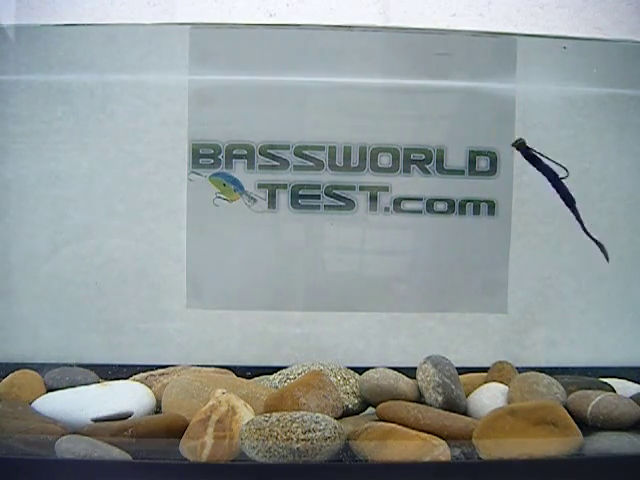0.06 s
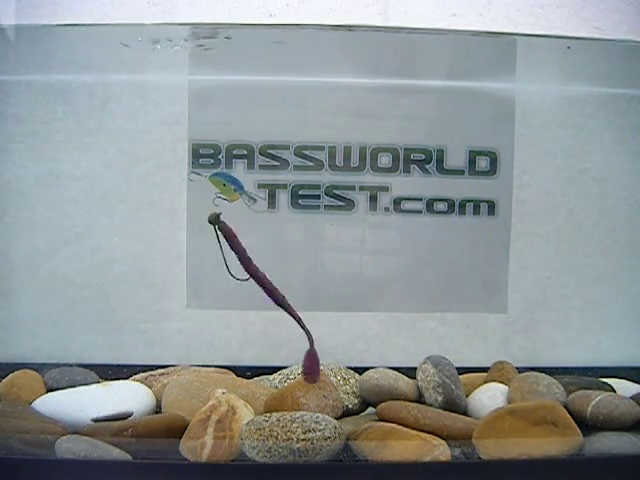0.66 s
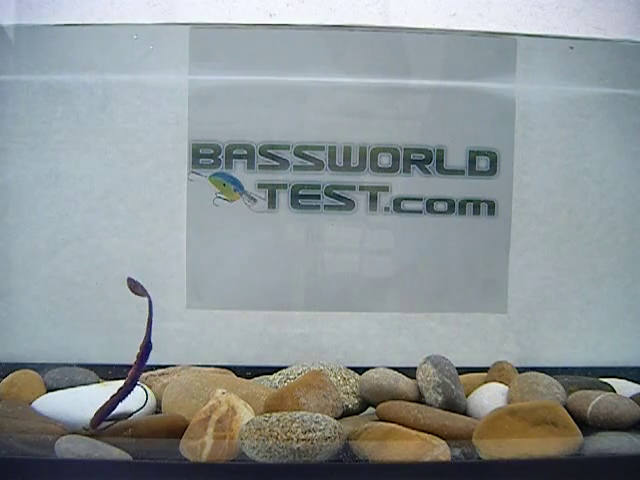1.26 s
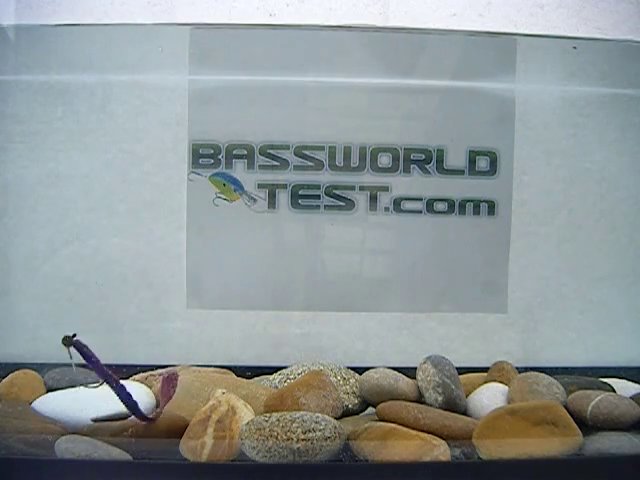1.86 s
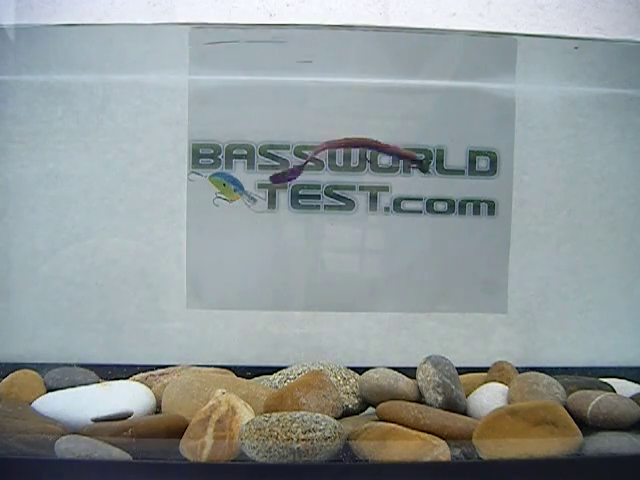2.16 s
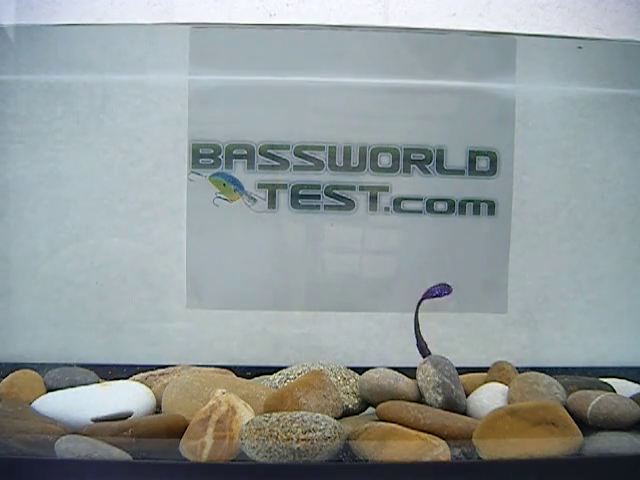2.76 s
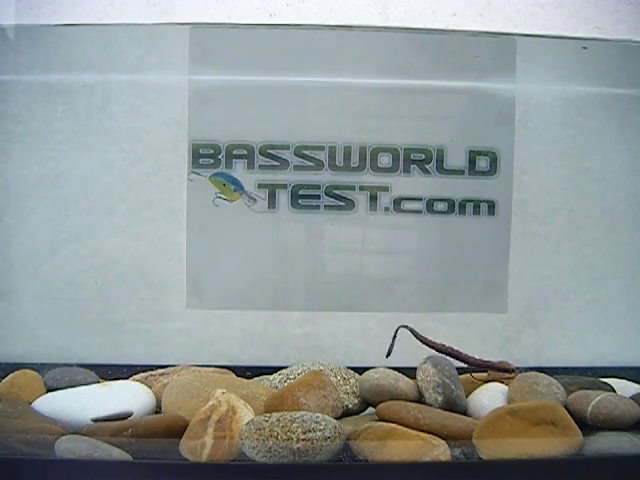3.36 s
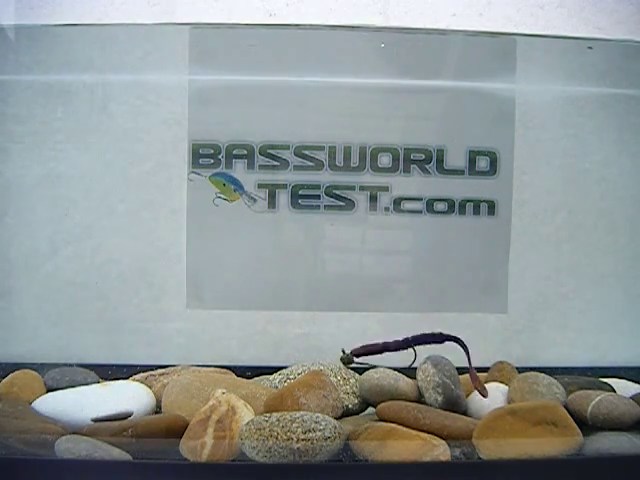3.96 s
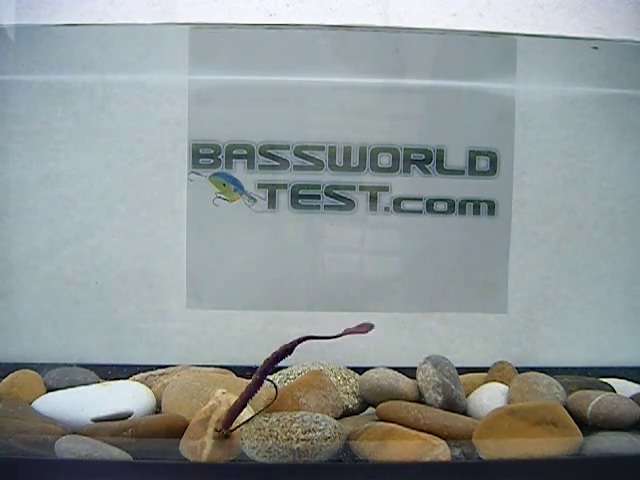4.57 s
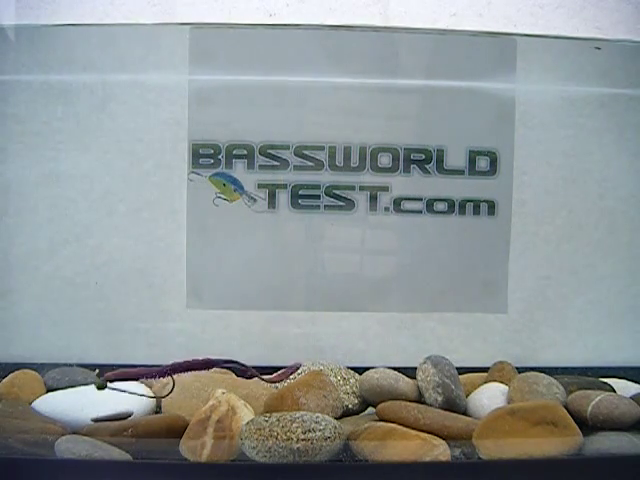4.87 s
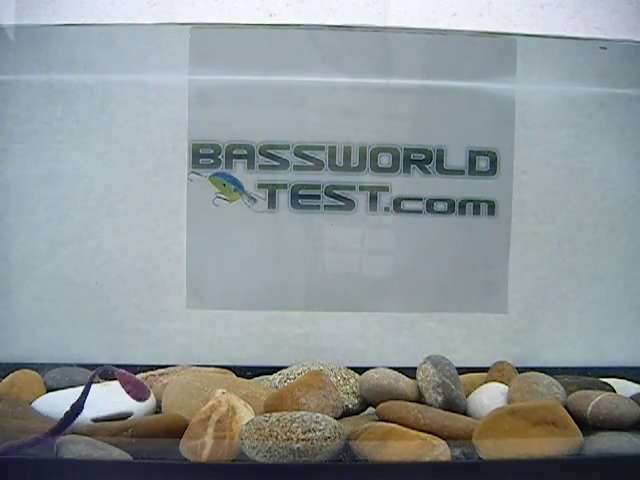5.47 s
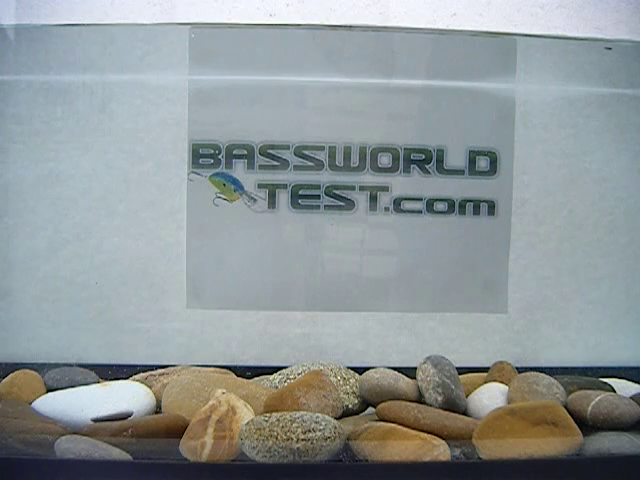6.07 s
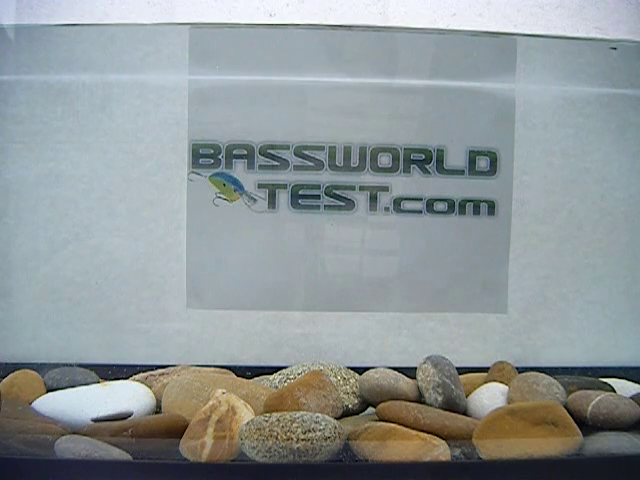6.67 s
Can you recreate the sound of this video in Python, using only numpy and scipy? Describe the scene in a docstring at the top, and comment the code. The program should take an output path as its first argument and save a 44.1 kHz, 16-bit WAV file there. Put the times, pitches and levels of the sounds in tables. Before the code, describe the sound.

Sharp, briefly ringing knocks and small ticks of a metal jig hopping over stones in an aquarium, above a steady low rumble.

```python
"""A water-filled glass tank: a weighted jig with a soft bait is hopped over the pebbles.
Its metal head cracks on the stones; each blow rings panes and water, and some pebbles rock and boom.
In between, hook and bait tick and scrape, and the taut line whistles faintly as it slides.
Underneath lie a low hum and the hiss of a pickup whose gain ducks after the hardest blows."""
import sys
import numpy as np
from scipy import signal
from scipy.fft import rfft, irfft
from scipy.io import wavfile
from scipy.ndimage import uniform_filter1d

SR = 44100
rng = np.random.default_rng(int(sys.argv[2]) if len(sys.argv) > 2 else 0)


def file_out(sig):
    """Save sig as 16-bit WAV at sys.argv[1]."""
    # one column per channel
    cols = np.atleast_2d(sig).T
    # limit, then scale
    lim = np.clip(cols, -1, 1)
    pcm = np.round(lim * 32767).astype(np.int16)
    wavfile.write(sys.argv[1], SR, pcm)


N = 296793
TIME_S = np.arange(N) / SR
AGE_S = TIME_S[:SR // 2]  # time within one event

# Head on stone: (time [s], relative level [dB], tilt [dB/oct], contact cut-off [Hz],
# crack over ring [dB], stone resonance [Hz], its boost [dB], stone note [Hz], note level [dB],
# rocking pitch [Hz], boom level [dB])
BLOWS = [(0.5259, -28, -0.6, 16000, 3, 3240, 6, 1132, -27.5, 570, -21.5),
         (1.089, -22.5, -0.37, 30000, -2.5, 2470, 9, 1248, -21, 735, -28),
         (1.208, -34.5, 0.5, 6500, -3, 2400, 2.5, 664, -45, 570, -38),
         (2.5070, -32, -1.3, 9500, -7.5, 2360, 3.5, 558, -25, 420, -25),
         (3.002, -39.5, 1.6, 5500, 3, 2900, 6, 1236, -31.5, 420, -42),
         (3.0130, -38, -0.9, 8000, -1, 1880, 7.5, 1120, -43, 281, -45),
         (3.0260, -43.5, -2, 9000, -9, 550, 1, 900, -46, 281, -43),
         (3.708, -53, -4, 6000, 2, 480, 4, 516, -37, 420, -47),
         (4.0818, -29.5, -1.6, 10000, 2.5, 3470, 6.5, 1147, -26.5, 218, -27.5),
         (4.5723, -33, -0.7, 12500, 3, 3500, 5.5, 1006, -31.5, 281, -40),
         (4.9914, -22.5, -0.35, 8650, 1.5, 690, 6, 1200, -29, 655, -29.5),
         (5.452, -18, 3.5, 10800, 1.5, 4100, 5, 1887, -22.5, 570, -34.5),
         (5.9320, -17.5, 3.5, 6830, 1.5, 3940, 9, 4130, -18, 735, -30)]
# Dense ring of panes and water: (frequency [Hz], gain [dB], early t60 [s], rise [s])
TANK_RING = [(111, -3.5, 0.84, 0.01), (267, 6, 0.43, 0.0033), (322, -6.5, 0.4, 0.025),
             (636, 2.5, 0.17, 0.0018), (1350, 3.5, 0.24, 0.0039), (1560, -1.5, 0.4, 0.0012),
             (1940, 1.5, 0.13, 0.00089), (3170, 0.5, 0.12, .001), (4530, -2.5, 0.17, 0.0003),
             (4700, 2.5, 0.033, 0.00028), (6460, 1.5, 0.15, 0.00036), (8150, 6, 0.099, 0.00024),
             (17000, -11.5, 0.064, 0.00029)]


def undb(db):
    """Decibels to gain."""
    return 10 ** (np.asarray(db) / 20)


def unit(x):
    """Scale to unit energy."""
    return x / np.sqrt(np.sum(x ** 2))


def add(out, start_s, x):
    """Mix x into out from start_s."""
    i = max(int(start_s * SR), 0)
    out[i:i + len(x)] += x[:N - i]


def log_interp(hz, at_hz, values):
    """Interpolate over log frequency."""
    return np.interp(np.log(hz + 1e-9), np.log(at_hz), values)


def colour(x, at_hz, db):
    """Minimum-phase filter through the given points."""
    size = 2 * len(x)
    gain = undb(log_interp(np.fft.rfftfreq(size, 1 / SR), at_hz, db))
    cepstrum = irfft(np.log(gain))
    cepstrum[1:len(x)] *= 2
    cepstrum[len(x) + 1:] = 0
    return irfft(rfft(x, size) * np.exp(rfft(cepstrum)))[:len(x)]


def band(hz, width_oct, size=len(AGE_S)):
    """Unit-rms noise in a bell around hz."""
    away = np.log2((np.fft.rfftfreq(size, 1 / SR) + 1) / hz) / width_oct
    x = irfft(rfft(rng.standard_normal(size)) * np.exp(-away ** 2 / 2), size)
    return x / x.std()


def fade(t60_s):
    """Free decay, 60 dB in t60_s."""
    return np.exp(-np.log(1000) * AGE_S / t60_s)


def build(rise_s):
    """Rise from silence as vibration spreads."""
    return 1 - np.exp(-AGE_S / rise_s)


def dense_ring(late_db=-17, late_t60_s=0.59):
    """Close modes of panes and water: lows come late and stay; a weak tail follows."""
    at_hz, _, t60s_s, rises_s = np.transpose(TANK_RING)
    out = 0
    for hz in np.geomspace(100, 17000, 24):
        t60_s, rise_s = log_interp(hz, at_hz, t60s_s), log_interp(hz, at_hz, rises_s)
        tail = undb(late_db) * min(t60_s / np.median(t60s_s), 1) * fade(late_t60_s)
        out += np.sqrt(hz) * unit(band(hz, 1 / 6) * build(rise_s) * (fade(t60_s) + tail))
    return unit(out)


def background(noise_db=-43.5, fall_db=2.5, ringing_db=-4):
    """Slowly easing rumble and hiss, partly heard through the ringing tank, and a steady hum."""
    # Noise spectrum: (frequency [Hz], relative density [dB])
    noise_spectrum = [(15, -28), (28, -0.5), (35, -4), (48, 1.5), (66, 3.5), (85, -8), (200, -10),
                      (520, -14.5), (800, -17), (2000, -23.5), (5000, -28), (10000, -32.5), (17000, -34.5)]
    # Hum lines: (frequency [Hz], rms level [dB])
    hum_lines = [(60, -66), (66.5, -58), (119, -61.5), (498, -62.5), (2400, -77)]
    ringing = signal.fftconvolve(rng.standard_normal(N + len(AGE_S) - 1), dense_ring(), "valid")
    noise = rng.standard_normal(N) + undb(ringing_db) * ringing
    noise = unit(colour(noise, *np.transpose(noise_spectrum))) * np.sqrt(N)
    hum = sum(undb(db) * np.sqrt(2) * np.sin(2 * np.pi * (hz * TIME_S + rng.random()))
              for hz, db in hum_lines)
    return noise * undb(noise_db + fall_db * (.5 - TIME_S / TIME_S[-1])) + hum


def grip(depth_db=2.0, grain_samples=60):
    """Uneven grip of rough stone, as a gain."""
    roughness = uniform_filter1d(rng.standard_normal(len(AGE_S)), grain_samples)
    return undb(depth_db * roughness * np.sqrt(grain_samples))


def scrapes(grit_hz=2850, pane_hz=560, pane_db=-6, rise_share=0.027):
    """The jig drags over stone: broad grit, a low pane murmur and one stone resonance; the long high rub at
    1.12 s is the line sliding."""
    # Drags, the one at 1.12 s being the line rubbing as it slides: (time [s], t60 [s], grit level [dB],
    # resonance [Hz], resonance level [dB])
    drags = [(0.002, 0.17, -35.5, 1690, -37.5), (0.44, 0.34, -48.5, 2460, -50.5),
             (0.491, 0.16, -43.5, 2980, -46), (0.591, 0.2, -43.5, 6100, -34),
             (1.12, 1.8, -54, 13000, -54.5), (2.055, 0.49, -48, 740, -50), (2.635, 0.18, -37.5, 1750, -42),
             (3.7278, 0.16, -54, 1800, -53), (3.775, 0.27, -64, 3060, -47.5)]
    out = np.zeros(N)
    for start_s, t60_s, grit_db, ring_hz, ring_db in drags:
        envelope = build(rise_share * t60_s) * fade(t60_s)
        broad = band(grit_hz, 1.27) + undb(pane_db) * band(pane_hz, 0.86)
        rub = undb(grit_db) * broad + undb(ring_db) * band(ring_hz, 0.43)
        add(out, start_s, envelope / envelope.max() * grip() * rub)
    return out


def hook_ticks(snap_db=4, wire_hz=6430, wire_db=-17, sizzle_hz=7000, sizzle_db=-13):
    """The hook taps a stone: a snap, then a brief ring of stone and wire."""
    # Taps: (time [s], level [dB], ring [Hz], ring width [oct])
    taps = [(0.3933, -35, 10600, 0.1), (0.7498, -41, 3350, 0.43), (0.9935, -24.5, 1300, 0.45),
            (1.089, -30, 15100, 0.25), (2.2589, -40.5, 2000, 0.77), (2.7293, -38, 1400, 0.46),
            (3.511, -42, 3170, 0.57), (3.622, -47, 3000, 0.42)]
    out = np.zeros(N)
    envelope = build(rise_s=0.00029) * (fade(t60_s=0.055) + undb(snap_db) * fade(t60_s=0.0043))
    for start_s, db, hz, width_oct in taps:
        ring = band(hz, width_oct) + undb(wire_db) * band(wire_hz, 0.071)
        sizzle = undb(sizzle_db) * band(sizzle_hz, 0.69)
        add(out, start_s, undb(db) * envelope * grip() * (ring + sizzle))
    return out


def crack(spread_s=0.001291, reflections_db=-3):
    """Contact pulse and first reflections; through glass the highs arrive first, and stronger."""
    hz = np.fft.rfftfreq(len(AGE_S), 1 / SR)
    delay_s = .0001 + spread_s / (1 + hz / 3000)
    pulse = irfft(np.exp(-2j * np.pi * np.cumsum(delay_s) * hz[1]), len(AGE_S))
    reflections = undb(reflections_db) * unit(rng.standard_normal(len(AGE_S)) * fade(t60_s=0.014))
    return unit(colour(pulse + reflections, at_hz=[1100, 2000, 3500], db=[-5, 2, 0]))


def tank_modes(scatter_db=3.0, rise_s=0.002):
    """Clear modes, struck differently at each spot, build as the pulse crosses the tank."""
    # Filled tank: (frequency [Hz], relative level [dB], t60 [s])
    modes = [(115.3, -0.5, 0.54), (218.6, -1.5, 0.91), (267.8, -6, 0.92), (421.6, -4.5, 0.2),
             (522, -6.5, 0.2), (572.4, 1, 0.18), (667, 4, 0.079), (740, -15, 0.49), (905, -12, 0.15),
             (896, 3.5, 0.092), (1060, -3, 0.073), (1156, -8, 0.11), (1255, -1.5, 0.15), (1905, -1, 0.073),
             (2420, -2.5, 0.047), (2585, -9, 0.06), (3390, -19, 0.11), (3860, -12, 0.1), (4240, -27, 0.21),
             (4450, -21, 0.032), (4400, -35, 0.077), (4970, -14, 0.15), (5190, -6, 0.03), (5400, -22, 0.18)]
    out = 0
    for hz, db, t60_s in modes:
        scatter, polarity = rng.standard_normal(2)
        gain = undb(db + scatter_db * scatter) * np.sign(polarity) * np.sqrt(hz / SR)
        out += gain * unit(np.sin(2 * np.pi * hz * AGE_S) * fade(t60_s))
    return build(rise_s) * out


def knocks(strength_db=28, stone_width=0.28):
    """The head rings the tank; softer contact cuts highs, the stone adds a tilt and a resonance."""
    # Hard blow before contact and stone colour it: (frequency [Hz], band level [dB])
    blow_spectrum = [(70, -15.5), (230, -4), (550, 1), (1100, -2.8), (2300, -0.9), (5000, -1.85),
                     (10000, -8.5), (16000, -1.5)]
    out = np.zeros(N)
    tank_hz, tank_db, _, _ = np.transpose(TANK_RING)
    hz, blow_db = np.transpose(blow_spectrum)
    bandwidth_db = 10 * np.log10(np.maximum(hz, hz[1]) / (SR / 2))  # higher bands span more hertz
    for start_s, db, tilt_db_per_oct, cutoff_hz, crack_db, stone_hz, stone_db, *_ in BLOWS:
        response = colour(dense_ring() + undb(crack_db) * crack(), tank_hz, tank_db) + tank_modes()
        contact_db = tilt_db_per_oct * np.log2(hz / 1500) - 10 * np.log10(1 + (hz / cutoff_hz) ** 4)
        blow = colour(response, hz, blow_db + contact_db - bandwidth_db)
        resonance_hz = stone_hz * (1 + stone_width) ** np.array([-1, 0, 1])
        blow = colour(blow, resonance_hz, [0, stone_db, 0])
        add(out, start_s, undb(strength_db + db) * blow / np.hypot(1, undb(crack_db)))
    return out


def swelling_tone(hz, peak_s, wander=0.042):
    """A driven mode swells, wavers in pitch and dies."""
    cycles = np.cumsum(hz * (1 + wander * band(44, 1))) / SR
    return AGE_S / peak_s * np.exp(1 - AGE_S / peak_s) * np.sin(2 * np.pi * cycles)


def rocking_stones(lag_s=0.002013, boost_db=9, reach_oct=0.076, fall_db_per_oct=3, swell_cycles=5.83):
    """A struck stone sounds its note and rocks, driving pane modes near its rocking pitch most."""
    # Bottom pane: (frequency [Hz], relative level [dB])
    pane_modes = [(112, -11.5), (218, -7), (283, -5), (420, -6.5), (505, -7), (570, -4), (655, -10),
                  (735, -12)]
    out = np.zeros(N)
    for start_s, *_, note_hz, note_db, rock_hz, boom_db in BLOWS:
        add(out, start_s + lag_s, undb(note_db) * swelling_tone(note_hz, peak_s=0.011))
        for hz, mode_db in pane_modes:
            away_oct = abs(np.log2(hz / rock_hz))
            drive_db = boost_db * np.exp(-(away_oct / reach_oct) ** 2) - fall_db_per_oct * away_oct
            boom = swelling_tone(hz, swell_cycles / hz)
            add(out, start_s + lag_s, undb(boom_db + mode_db + drive_db) * boom)
    return out


def line_whistles(waver=0.0082, flicker_db=4, friction_hz=13000):
    """The taut line slides: thin glides follow its speed and break up as it catches, in friction hiss."""
    # Slides: (time [s], length [s], start [Hz], middle [Hz], end [Hz], level [dB])
    slides = [(1.422, 0.13, 14200, 14100, 14900, -57.5), (3.095, 0.22, 12300, 12700, 12900, -61),
              (3.215, 0.09, 6100, 6200, 6300, -59.5), (5.075, 0.29, 11700, 14800, 12500, -58.5)]
    out = np.zeros(N)
    for start_s, length_s, *path_hz, db in slides:
        size = int(length_s * SR)
        progress = np.linspace(0, 1, size)
        glide_hz = np.polyval(np.polyfit([0, .5, 1], path_hz, 2), progress)
        hz = glide_hz * (1 + waver * band(100, 1.6, size))
        flicker = undb(flicker_db * (band(30, 1, size) + 0.5))
        tone = flicker * np.sin(2 * np.pi * np.cumsum(hz) / SR)
        arch = np.sqrt(4 * progress * (1 - progress))
        add(out, start_s, undb(db) * arch * (tone + band(friction_hz, 0.38, size)))
    return out


def scene():
    """All sources reach one pickup on the tank."""
    return (knocks() + rocking_stones() + hook_ticks() + scrapes() + line_whistles() + background())[None]


def gain_control(x, limit_db=-5, slope=0.33, release_db_per_s=13.0, attack_s=0.015):
    """Peaks over the limit duck the gain quickly; it creeps back."""
    release_db = release_db_per_s * TIME_S
    held_db = np.maximum.accumulate(20 * np.log10(np.abs(x) + 1e-9) + release_db) - release_db
    cut_db = slope * np.maximum(held_db - limit_db, 0)
    step = 1 / (attack_s * SR)
    return x * undb(-signal.lfilter([step], [1, step - 1], cut_db))


def record(dry, top_hz=17400):
    """Pickup: narrow notch near 8 kHz, gain control, overload, steep top cut."""
    notched = colour(dry[0], [6350, 7400, 7680, 7980, 8510, 9660], [-0.5, -9.0, -24, -18.5, -6.5, 1.0])
    clipped = np.clip(gain_control(notched), -1, 1)
    return signal.sosfilt(signal.ellip(8, .2, 70, top_hz, fs=SR, output="sos"), clipped)[None]


dry = scene()
out = record(dry)
file_out(out)
```